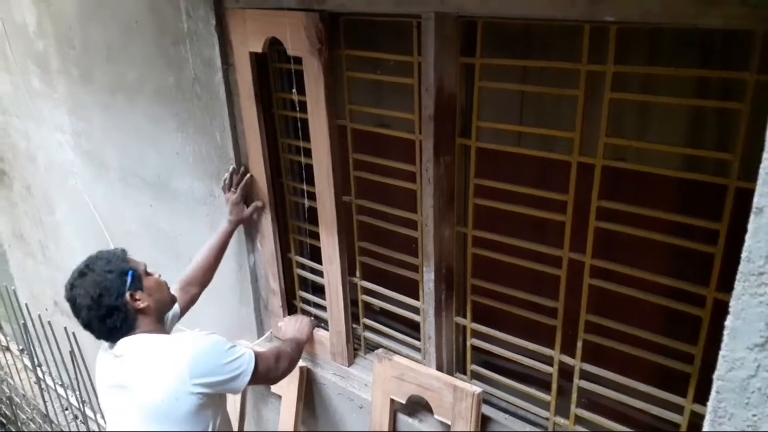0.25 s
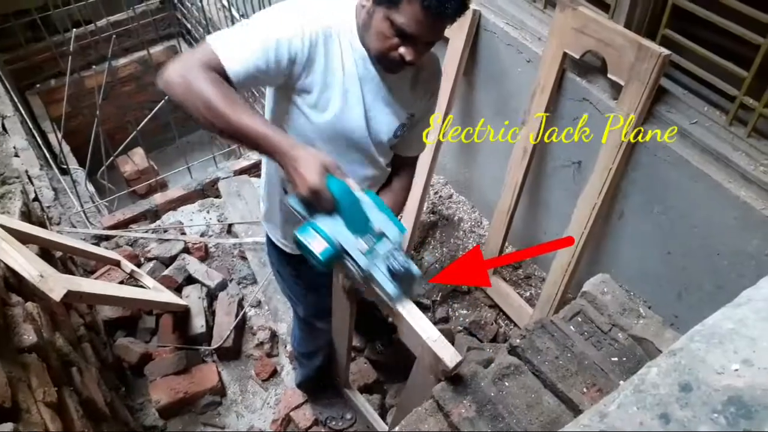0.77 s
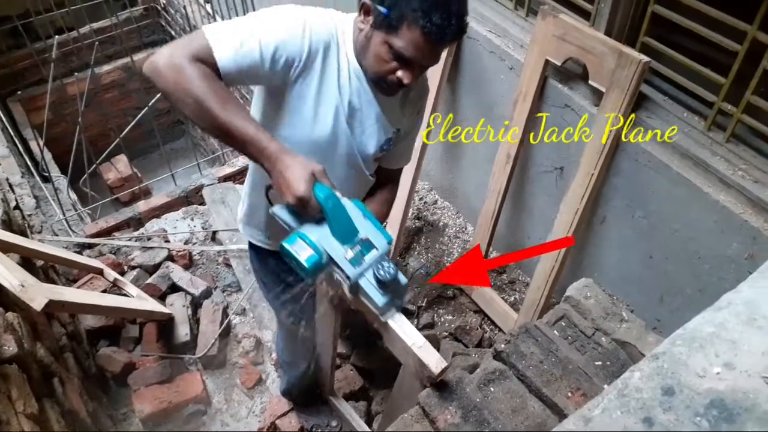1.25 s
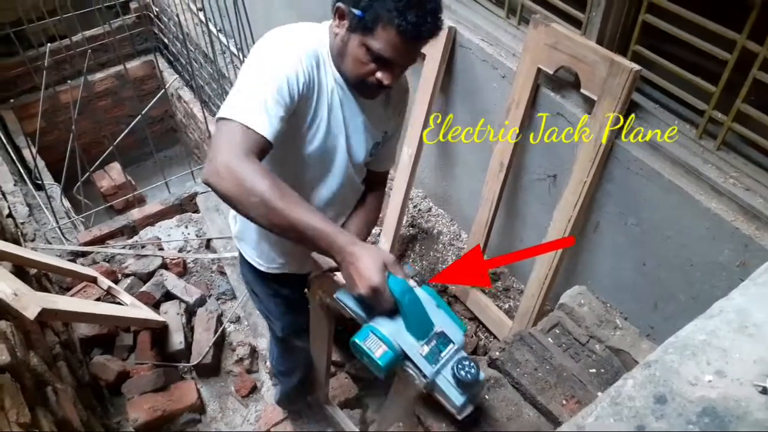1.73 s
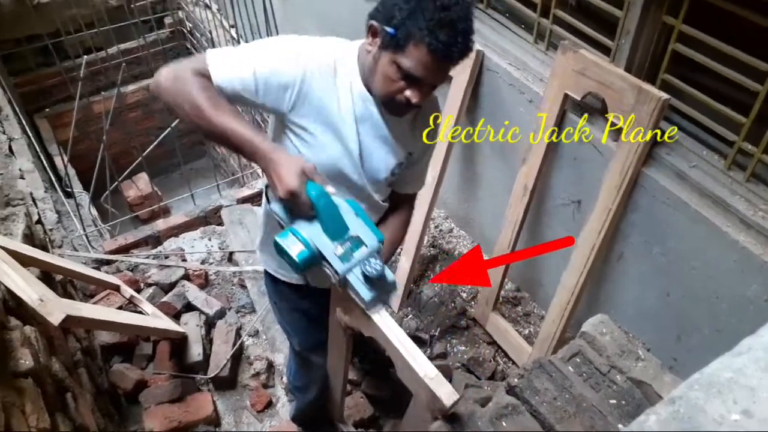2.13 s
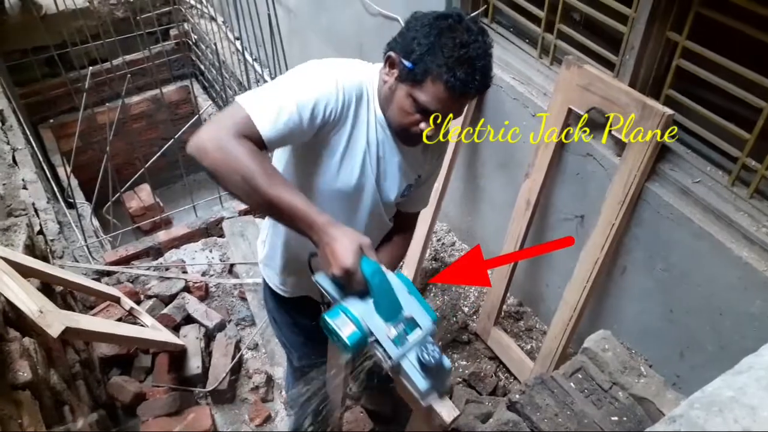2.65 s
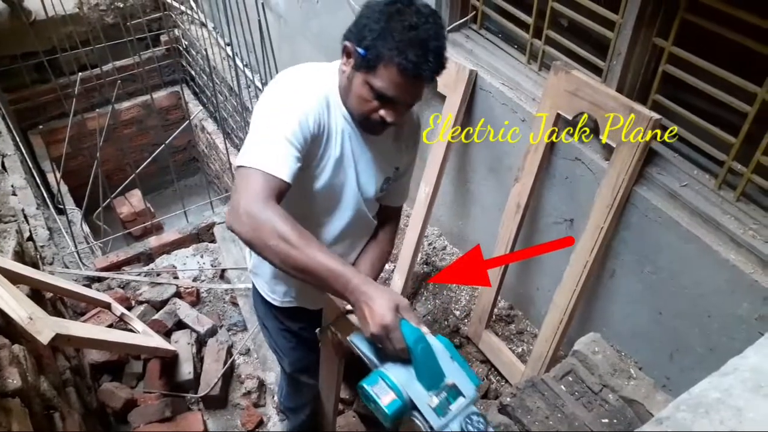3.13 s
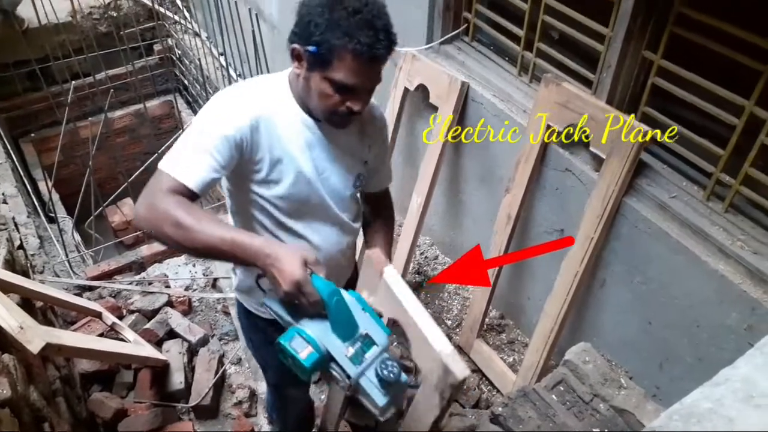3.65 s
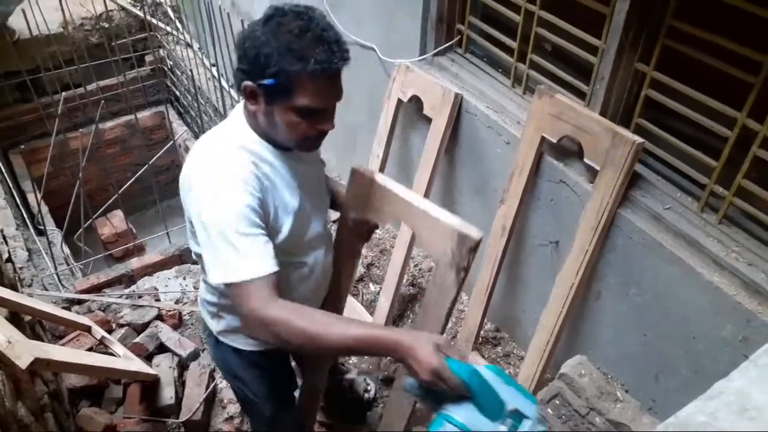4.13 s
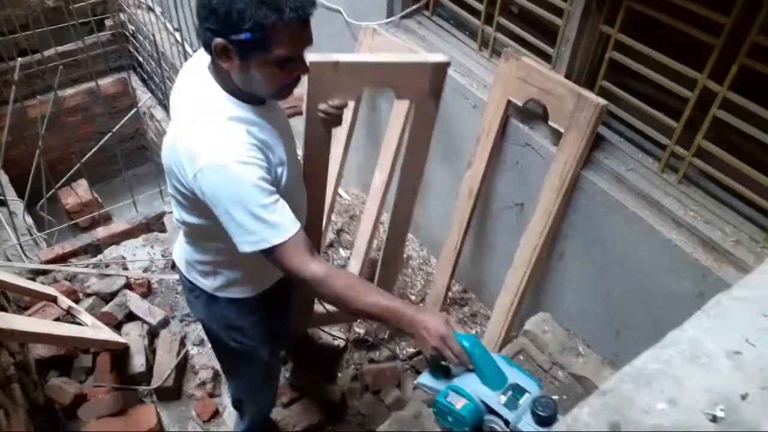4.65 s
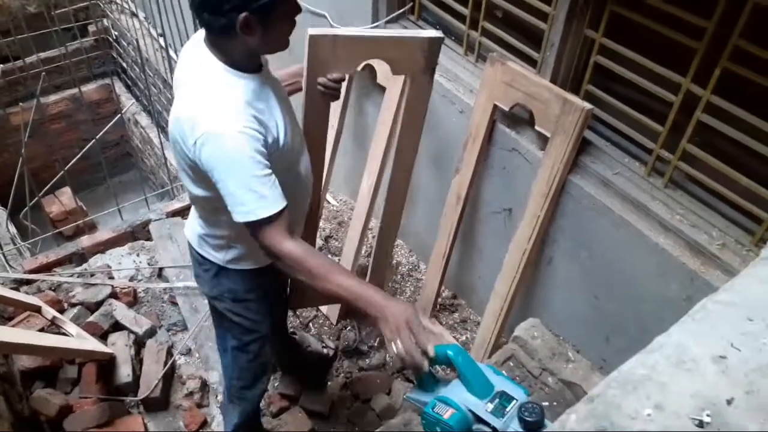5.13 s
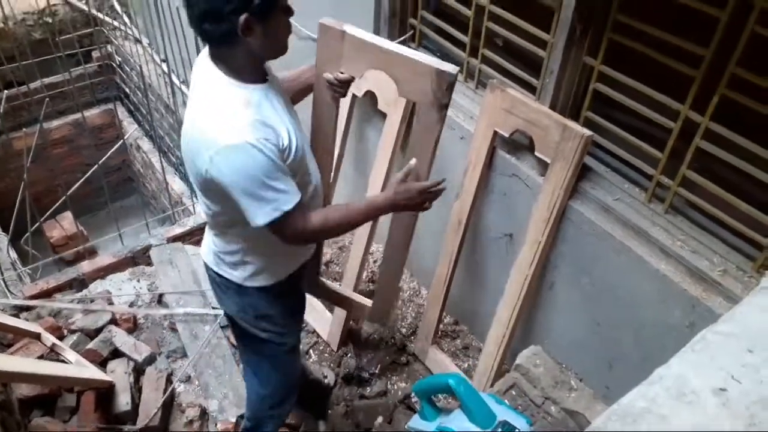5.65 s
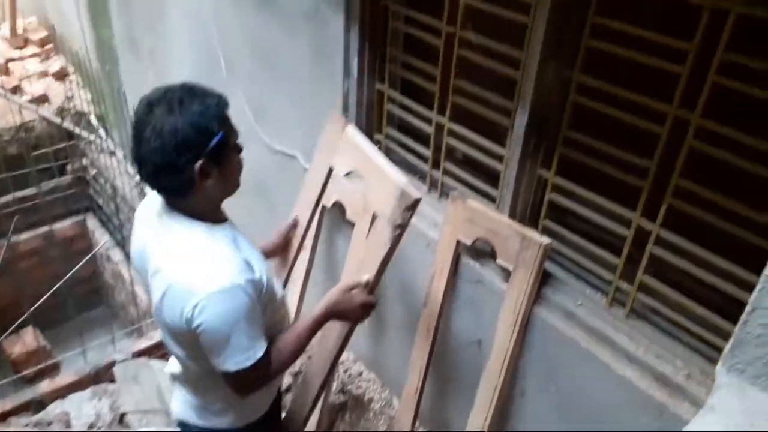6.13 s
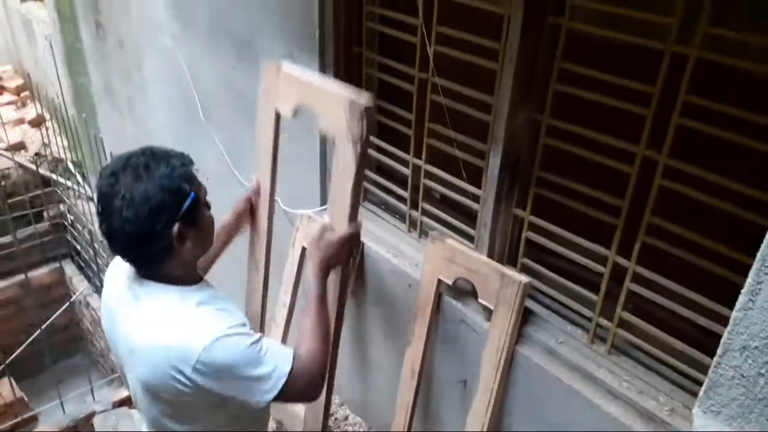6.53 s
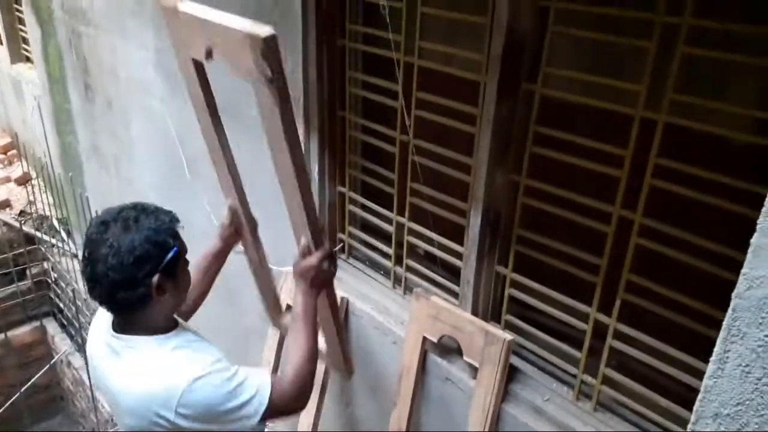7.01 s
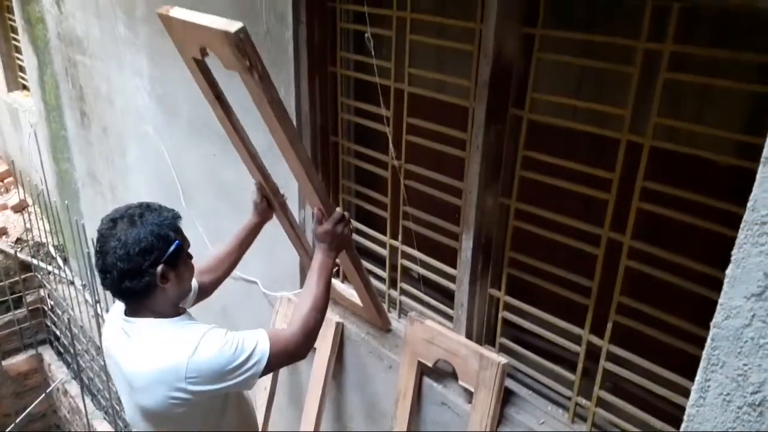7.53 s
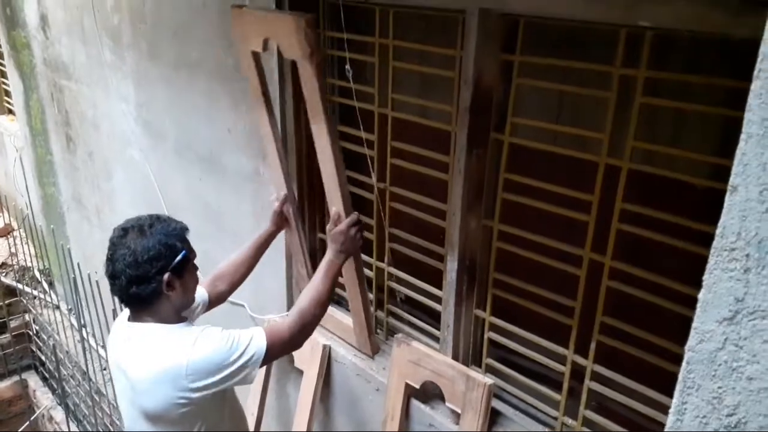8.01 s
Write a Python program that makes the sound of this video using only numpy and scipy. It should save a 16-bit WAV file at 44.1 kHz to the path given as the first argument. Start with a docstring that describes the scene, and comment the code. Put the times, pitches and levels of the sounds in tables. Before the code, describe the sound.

A power planer runs close to the microphone on a building site, starting abruptly with a rush of air and a high motor whine. Its blades bite into wood in two passes, each with a hammering buzz and a hiss of shavings. The motor is cut and the tool coasts, sinking in pitch and slowly fading over a faint low hum. Late on, a wooden frame gives a few quick, dull knocks.

```python
"""A moment of quiet, then the scene changes to an electric hand planer, close by, still spinning up to speed on
a building site. Its fan and drum tear the air into a roar while blades, bearing and motor whine. It makes two
strokes along a wooden frame, biting hard at both ends of each: the blades hammer a buzz, chips hiss and the
pitch sags. Switched off and laid on the brickwork, it runs down with its housing ringing. The site hums
underneath, and late on the frame knocks against a grille."""
import sys
import numpy as np
from scipy import signal
from scipy.fft import rfft, irfft
from scipy.io import wavfile
from scipy.ndimage import uniform_filter1d

SR = 44100
rng = np.random.default_rng(int(sys.argv[2]) if len(sys.argv) > 2 else 0)


def dump_mix(stems):
    """Bounce the given channels to the path in sys.argv[1] as a 16-bit WAV at rate SR."""
    frames = np.atleast_2d(stems).T  # one column per channel
    limited = np.clip(frames, -1, 1)  # hard clip at full scale
    pcm = np.round(limited * 32767).astype(np.int16)
    wavfile.write(sys.argv[1], SR, pcm)


N = 364642
T = np.arange(N) / SR

# Stereo image (frequency [Hz], left-right likeness [0-1])
STEREO_LIKENESS = [(60, 0.97), (240, 0.92), (950, 0.2), (3770, 0.27), (15000, 0.0058)]
# Microphone balance (frequency [Hz], left minus right [dB])
BALANCE = [(60, -0.5), (380, -1.5), (2380, -0.5), (15000, -0.5)]
# Narrow treble dip near 8.3 kHz (centre [Hz], width [Hz], gain [dB])
TREBLE_DIP = (8276, 465, -10.5)

# Tone of the opening quiet (frequency [Hz], level [dB])
QUIET_EQ = [(24, -25), (40, -3.5), (98, -4), (514, -11), (2780, -21.5), (3390, -24), (4340, -29),
            (15000, -42.5)]
# Thin whine in the quiet (centre [Hz], width [Hz], level [dB])
THIN_WHINE = (3400, 38, -57.5)
# Tone of the site hum (frequency [Hz], level [dB])
HUM_EQ = [(30, -22), (60, -1.5), (110, 3.5), (200, 1), (400, -2.5), (900, -25)]
# Fader of the site hum (time [s], level [dB])
HUM_FADER = [(.35, -54.5), (1.6, -57), (4.6, -60), (5.7, -53), (7.3, -55.5), (8.27, -46.5)]
# The frame touching the grille (time [s], level [dB])
KNOCK_CUES = [(7.603, -30), (7.611, -19.5), (7.665, -26.5), (7.719, -31)]
# Ring of the knocked frame (frequency [Hz], level [dB], decay by 60 dB [s])
FRAME_MODES = [(95, -17, .25), (170, -14, .12), (296, 0, .06), (480, -9, .05), (900, -8, .03)]
# Chips and air reaching the microphone (time [s], rise [s], fall [s], level [dB])
PUFF_CUES = [(1.185, 0.027, 0.025, -26), (2.47, 0.039, 0.023, -39.5)]
# Tone of a puff (frequency [Hz], level [dB])
PUFF_EQ = [(25, -15), (60, 1), (150, -4.5), (350, -8), (800, -26)]

# The driven drum sags in each bite and climbs back (time [s], speed [turns/s])
DRIVEN_SPEED = [(0.3, 231.8), (0.49, 244.8), (0.73, 256.6), (1.04, 267.7), (1.09, 255.5), (1.15, 236.3),
                (1.22, 221.2), (1.33, 226.5), (1.64, 232.8), (1.7, 224.7), (1.76, 225.0), (1.86, 236.9),
                (2.08, 251.0), (2.16, 255.0), (2.34, 248.4), (2.42, 231.6), (2.5, 221.5), (2.56, 218.8),
                (2.85, 228.3), (2.94, 233.3), (3.02, 217.7)]
# Roar and rattle as the tool is turned, lifted and laid down (time [s], relative level [dB])
TOOL_FADER = [(.35, -26.5), (1.05, -26.5), (1.65, -30.5), (1.85, -29), (2.3, -29.5), (2.85, -28),
              (3.15, -31.5), (4.2, -34.5), (4.7, -35), (5.4, -31.5), (6.2, -32), (7, -34.5), (7.6, -36.5),
              (8.27, -41)]
# Tone of the air roar (frequency [Hz], level in the hand [dB], level on brick [dB])
ROAR_EQ = [(60, -78, -64), (193, -36.5, -43), (525, -2.5, -8), (800, -11, -14.5), (1120, -1.5, -20),
           (1106, -1.5, -2), (1460, -11, -9), (2110, -3.5, 0), (2900, -5, -5.5), (4400, -2, -2),
           (5080, -6.5, -5), (7000, -8, -8), (9260, -14, -17.5), (15500, -14.5, -17)]
# Resonances of the housing (centre [Hz], width [Hz], gain [dB])
HOUSING_RINGS = [(1378, 22, -4), (1828, 13.4, 8.5), (2074, 26, 2), (2310, 17, -0.5), (3320, 95, -2),
                 (5010, 240, 3)]
# Bearing tones (pitch [multiples of the ball pass]) and their mix (level [dB])
BEARING_PARTIALS = (4, 5, 7, 10)
BEARING_MIX = (2, 5.5, 0, -5)
# Mix of the even motor harmonics 2-18 (level [dB])
MOTOR_MIX = (11, 4, 0, 3, 2.5, -8, -4, -8, -1)
# Inharmonic side tones (pitch [cycles/drum turn]) and their mix (level [dB])
SIDE_PARTIALS = (14.73, 16.55, 17.55, 18.55, 21.9, 29.7)
SIDE_MIX = (3.5, 4, 1, -27, -8, 1)
# Weaker drum harmonics (pitch [cycles/drum turn]) and their mix (level [dB])
WHISTLE_PARTIALS = (1, 8, 10, 12, 14)
WHISTLE_MIX = (3, 0.5, -4, -3, -6)
# Resonances the bearing whine glides through (centre [Hz], width [Hz], gain [dB])
BEARING_RINGS = [(1813, 140, -32.5), (2103, 52, -32), (2300, 79, -34), (4904, 360, -38)]
# Resonances the blade tones glide through (centre [Hz], width [Hz], gain [dB])
BLADE_TONE_RINGS = [(217, 59, -12), (338, 24, -13.5), (497, 153, -1), (551, 11.7, -19), (604, 20, 5),
                    (764, 20, -2), (1032, 200, -5.5), (1586, 620, 1)]
# Blade harmonics 1-3 at 250 turns/s, ahead of those resonances (level [dB])
BLADE_MIX = (-38.5, -28.5, -34.5)

# Blades in the wood (start [s], hold [s], blow level [dB], chip level [dB], blade evenness [0-1],
# bright band [Hz], its boost [dB])
CUT_CUES = [(1.043, .17, -14, -21.5, 0.72, 3740, 4.5), (1.24, 0.43, -24, -30.5, 0.38, 4700, 9),
            (1.642, 0.093, -20, -37, 0.6, 4630, 2), (2.343, 0.12, -14, -21.5, 0.68, 3900, 5),
            (2.492, .22, -26, -28, 0, 4500, 3), (2.775, 0.097, -21.5, -51, 0, 5940, 11),
            (2.937, 0.059, -16, -31, 0.44, 4700, 11)]
# Tone of the frame under the blades (frequency [Hz], level [dB])
WOOD_EQ = [(150, -45), (600, -12.5), (1100, -17.5), (1500, -12.5), (2100, -6), (2850, -1), (3700, -7),
           (5000, -9.5), (7000, -12.5), (11000, -46), (15500, -3)]
# Resonances of the planed wood (centre [Hz], width [Hz], gain [dB])
CUT_RINGS = [(1470, 100, 9), (1738, 37, 3.5), (3040, 84, -10), (3520, 84, -16), (5600, 74, -29)]
# Tone of the tearing chips (frequency [Hz], level [dB])
CHIP_EQ = [(300, -24.5), (1500, -0.5), (3000, -13), (6000, 2.5), (9000, 2.5), (15500, -1)]

START_S, OFF_S = .3488, 2.96  # the scene changes to the running planer; it is switched off
LAID_S, SETTLED_S = 3.8, 7.6  # the brick gradually takes the tool's weight
BALL_PASS = 2.594  # cycles per drum turn
MOTOR_PULLING, MOTOR_COASTING = 1.78, 1.765  # turns per drum turn: the belt creeps when it pulls


def amp(db):
    """Gain of a level in dB."""
    return 10 ** (np.asarray(db) / 20)


def unit_rms(x):
    """Normalises to rms 1."""
    return x / np.sqrt(np.mean(x ** 2) + 1e-20)


def at_hz(points, hz, column=1):
    """Reads a spectrum table on a log frequency axis."""
    points = np.asarray(points)
    return np.interp(np.log(hz + 1), np.log(points[:, 0] + 1), points[:, column])


def automation(rows, t=T):
    """Straight ramps between (time, value) points."""
    return np.interp(t, *np.transpose(rows))


def gate(t, start, hold, rise, fall):
    """Envelope that rises from 0 to 1, holds and dies away."""
    attack = np.clip((t - start) / rise, 0, 1) ** 2
    return attack * np.exp(-(np.maximum(t - start - hold, 0) / fall) ** 2 * 4)


def peaks(modes, hz, order=0.52):
    """Summed gain of resonances; a higher order is steeper."""
    return sum(amp(db) / (1 + (2 * (hz - f) / width) ** 2) ** order for f, width, db in modes)


def equalise(x, gain):
    """Minimum-phase EQ with the curve gain(hz)."""
    log_gain = np.log(gain(abs(np.fft.fftfreq(4096, 1 / SR))) + 1e-5)
    taps = np.fft.ifft(np.exp(np.conj(signal.hilbert(log_gain)))).real[:2048]
    return signal.oaconvolve(x, taps)[:len(x)]


def noise(field_db, size=512, patchy_db=0., count=N):
    """Stereo noise shaped by field_db(hz, t), with drifting patches patchy_db deep."""
    hz = np.fft.rfftfreq(size, 1 / SR)[:, None]
    t = np.arange(count * 4 // size + 5) * size / 4 / SR
    a, b, c, d, patches = rng.standard_normal((len(t), len(hz), 5)).T
    patches = unit_rms(uniform_filter1d(uniform_filter1d(patches, 3, axis=0), 16, axis=1))
    likeness = at_hz(STEREO_LIKENESS, hz)
    left = a + 1j * b
    right = likeness * left + np.sqrt(1 - likeness ** 2) * (c + 1j * d)
    spectra = np.array([left, right]) * amp(field_db(hz, t) + patchy_db * patches)
    return signal.istft(spectra, nperseg=size, noverlap=size * 3 // 4)[1][:, :count]


def tones(orders, mix_db, turns, waver_db=1):
    """Sines locked to a rotation, near rms 1 in sum; each wavers as the hand turns the tool."""
    waver_times = np.arange(100) * .13
    stack = 0
    for order, db in zip(orders, mix_db):
        level = np.interp(T, waver_times, amp(db + waver_db * rng.standard_normal(100)))
        stack += level * np.cos(2 * np.pi * (order * turns + rng.random()))
    return stack * np.sqrt(2 / np.sum(amp(mix_db) ** 2))


def clicks(turns, per_s, top_hz):
    """One click a turn: the closed sum of all its overtones up to top_hz."""
    angle, count = np.pi * (turns % 1) + 1e-6, np.floor(top_hz / per_s)
    return (np.sin((2 * count + 1) * angle) / np.sin(angle) - 1) / np.sqrt(2 * count)


def walls(x, t60, wet_db):
    """Direct sound plus sparse echoes off brick and plaster, centred in the bass and wide above."""
    length = 12000
    taps = np.zeros((3, length))
    delays = np.arange(60, length - 20, 20) + rng.integers(0, 20, (3, 596))
    np.put_along_axis(taps, delays, rng.choice([-1., 1.], delays.shape), axis=1)
    taps *= amp(-60 * np.arange(length) / SR / t60)
    spectra = rfft(taps / np.linalg.norm(taps[0]))
    likeness = at_hz(STEREO_LIKENESS, np.fft.rfftfreq(length, 1 / SR))
    response = irfft(np.sqrt(likeness) * spectra[0] + np.sqrt(1 - likeness) * spectra[1:]) * amp(wet_db)
    response[:, 0] += 1  # direct sound
    return signal.oaconvolve(x[None], response, axes=1)[:, :N] / np.sqrt(1 + amp(2 * wet_db))


def opening_quiet():
    """A faint, dark noise bed with one narrow band whining above it."""
    centre, width, whine_db = THIN_WHINE
    bed = noise(lambda hz, t: at_hz(QUIET_EQ, hz), size=1024, count=SR)
    whine = noise(lambda hz, t: -20 * np.log10(1 + (2 * (hz - centre) / width) ** 2), size=2048, count=SR)
    quiet = amp(-48.5) * unit_rms(bed) + amp(whine_db) * unit_rms(whine)
    return np.pad(quiet, ((0, 0), (0, N - SR)))


def site_hum():
    """The low, drifting hum of the site under the tool."""
    hum = noise(lambda hz, t: at_hz(HUM_EQ, hz), size=2048, patchy_db=2.5)
    return amp(automation(HUM_FADER)) * unit_rms(hum)


def frame_knocks():
    """The frame rings low and short at each touch of the grille."""
    t, hits = T[:20000], np.zeros(N)
    ring = sum(amp(db - 60 * t / t60) * np.sin(2 * np.pi * hz * t) for hz, db, t60 in FRAME_MODES)
    for time, db in KNOCK_CUES:
        hits[round(time * SR)] = amp(db)
    return signal.oaconvolve(hits, ring)[:N]


def air_puffs():
    """Puffs of chips and air hit the microphone: a low rumble, unlike left and right."""
    envelope = sum(amp(db) * np.exp(-((T - time) / np.where(T < time, rise, fall)) ** 2)
                   for time, rise, fall, db in PUFF_CUES)
    shared, left, right = (unit_rms(equalise(white, lambda hz: amp(at_hz(PUFF_EQ, hz))))
                           for white in rng.standard_normal((3, N)))
    return envelope * np.array([shared + 0.46 * left, 0.24 * shared + 0.96 * right])


def drum_speed(drag_per_s=.15267, friction_turns_s2=17.559):
    """Turns per second: driven, then coasting against speed-dependent drag and constant dry friction."""
    coast_start, start_speed = DRIVEN_SPEED[-1]
    since = np.maximum(T - coast_start, 0)
    friction_offset = friction_turns_s2 / drag_per_s
    coast = (start_speed + friction_offset) * np.exp(-drag_per_s * since) - friction_offset
    early_speed_drop = 3.9 * (1 - np.exp(-since / .5))  # the pitch falls a little faster at first
    return np.where(T < coast_start, automation(DRIVEN_SPEED), coast - early_speed_drop)


def air_roar(turns):
    """Air torn by fan and drum, throbbing with each blade; the housing rings more as the tool settles."""
    def field_db(hz, t):
        rest = np.interp(t, (LAID_S, SETTLED_S), (0.16, 1))
        held_db = at_hz(ROAR_EQ, hz)
        resting_db = at_hz(ROAR_EQ, hz, column=2) + 20 * np.log10(1 + 0.59 * peaks(HOUSING_RINGS, hz))
        shelf_db = 4.5 * np.clip((hz - 6000) / 3000, 0, 1)
        return (1 - rest) * held_db + rest * resting_db + shelf_db + automation(TOOL_FADER, t) - 17.5
    throb = 1 + 0.053 * np.cos(4 * np.pi * turns)
    return noise(field_db, size=1024, patchy_db=3.5) * throb


def drive_rattle(turns, speed):
    """Ball bearing, motor shaft and drum tones, heard through the ringing housing."""
    def housing_gain(hz):
        band_pass = 1 / (1 + (1050 / (hz + 1)) ** 4) / (1 + (hz / 6500) ** 4)
        return (0.61 + 0.66 * peaks(HOUSING_RINGS, hz)) * band_pass
    # each ball ticks over a flaw, harder once a drum turn
    ticks = clicks(BALL_PASS * turns, BALL_PASS * speed, top_hz=8800)
    ticks *= 1 + 0.41 * np.cos(2 * np.pi * turns)
    ticks *= (150 / speed) ** .8  # the ticks come forward as the drum slows
    bearing = amp(6) * ticks + tones(BEARING_PARTIALS, BEARING_MIX, BALL_PASS * turns)
    powered = T < OFF_S
    motor_turns = np.cumsum(np.where(powered, MOTOR_PULLING, MOTOR_COASTING) * speed) / SR
    motor = amp(-5.5) * tones(range(2, 20, 2), MOTOR_MIX, motor_turns)
    side_tones = amp(np.where(powered, -5, -7)) * tones(SIDE_PARTIALS, SIDE_MIX, turns)
    whistle = amp(-1) * tones(WHISTLE_PARTIALS, WHISTLE_MIX, turns)
    level_db = automation(TOOL_FADER) - 5.5 + 2 * np.log2(speed / 250)
    return amp(level_db) * equalise(bearing + motor + side_tones + whistle, housing_gain)


def planer_whine(turns, speed):
    """Bearing whine and blade tones, swelling as they glide through resonances."""
    def glide(order, rings, floor=0):
        resonance = floor + peaks(rings, order * speed, order=1)
        return resonance * tones([order], [0], turns, waver_db=2)
    whine = glide(8 * BALL_PASS, BEARING_RINGS)
    slowing_db = 14.5 * np.log2(speed / 250)  # the blade tones fade as the drum slows
    for order, db in zip((2, 4, 6), BLADE_MIX):
        whine += amp(db + slowing_db) * glide(order, BLADE_TONE_RINGS, floor=0.019)
    return whine


def tearing_chips(turns, build_s=.12, clear_s=.11):
    """Chips tear off in a hiss that builds through each cut and pulses with every blade."""
    envelope = np.zeros(N)
    for start, hold, _, chips_db, *_ in CUT_CUES:
        on = (T > start) & (T < start + hold + 2 * clear_s)
        swell = amp(chips_db) * gate(T[on], start, hold, build_s, clear_s) ** .5
        envelope[on] = np.maximum(envelope[on], swell)
    hiss = np.tile(unit_rms(noise(lambda hz, t: at_hz(CHIP_EQ, hz), count=N // 2)), 2)
    blade_pulse = 0.42 + 0.47 * np.exp(-(2 * turns % 1) / 0.21)
    return amp(8.5) * envelope * blade_pulse * hiss


def blade_blows(turns, speed, bite_s=.023, leave_s=.063, bright_octaves=.19):
    """Two blades bite the wood once a turn each, one deeper than the other, and make the frame buzz."""
    blows = np.zeros(N)
    for start, hold, blows_db, _, evenness, bright_hz, bright_db in CUT_CUES:
        on = (T > start) & (T < start + hold + .22)
        flutter = 1 + 0.29 * unit_rms(uniform_filter1d(rng.standard_normal(N // 8), 150))[:on.sum()]
        swell_times = start + np.arange(9) * .09
        control_t, drum_hz = T[on][::32], speed[on][::32]
        buzz, power = 0, 0
        for k in range(1, 56):
            # the contact travels along the wood, so each overtone swells on its own
            swell_db = 2.66 * np.interp(control_t, swell_times, rng.standard_normal(len(swell_times)))
            swell_db += bright_db * np.exp(-(np.log2(k * drum_hz / bright_hz) / bright_octaves) ** 2)
            level = (1 - evenness if k % 2 else 1) * amp(swell_db)  # even blades cancel odd overtones
            power += (level * amp(at_hz(WOOD_EQ, k * drum_hz))) ** 2
            phase = k * turns[on] - k ** 2 / 220  # a bite takes time, so each blow is a short sweep
            buzz += np.interp(T[on], control_t, level) * np.cos(2 * np.pi * phase)
        buzz /= np.sqrt(np.interp(T[on], control_t, power))  # make-up gain for the wood EQ
        blows[on] += amp(blows_db) * gate(T[on], start, hold, bite_s, leave_s) * flutter * buzz
    return equalise(blows, lambda hz: amp(at_hz(WOOD_EQ, hz)) * (1 + peaks(CUT_RINGS, hz)))


def scene():
    """A hard cut from the quiet to the running planer, whose pitches all follow one drum speed."""
    speed = drum_speed()
    turns = np.cumsum(speed) / SR
    blows, chips = blade_blows(turns, speed), tearing_chips(turns)
    rattle, whine = drive_rattle(turns, speed), planer_whine(turns, speed)
    quiet, hum = opening_quiet(), site_hum()
    planer = walls(whine, t60=0.17, wet_db=-7)
    planer += walls(rattle, t60=0.2, wet_db=7)
    planer += walls(blows, t60=0.1, wet_db=1.5)
    planer += air_roar(turns) + chips + air_puffs()
    knocks = walls(frame_knocks(), t60=0.2, wet_db=-1.5)
    running = np.clip((T - START_S) / .0005, 0, 1)
    return (1 - running) * quiet + running * (planer + knocks + hum)


def record(dry):
    """Overall tone: treble dip, bass roll-off, left-right balance and a steep top cut."""
    def port(x, side):
        centre, width, dip_db = TREBLE_DIP
        def gain(hz):
            treble_db = dip_db * np.exp(-((hz - centre) / width) ** 2)
            bass_db = -10 * np.log10(1 + (45 / (hz + 1)) ** 4)
            return amp(treble_db + bass_db + side * at_hz(BALANCE, hz) / 2)
        return equalise(x, gain)
    left = port(dry[0], side=1)
    right = np.roll(port(dry[1], side=-1), shift=2)  # the tool is a little nearer the left port
    top_cut = signal.firwin(511, 15550, window=("kaiser", 9), fs=SR)
    return signal.oaconvolve(np.array([left, right]), top_cut[None], "same")


dry = scene()
out = record(dry)
dump_mix(out)
```